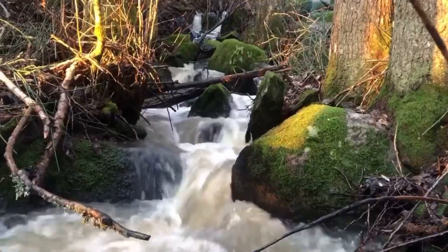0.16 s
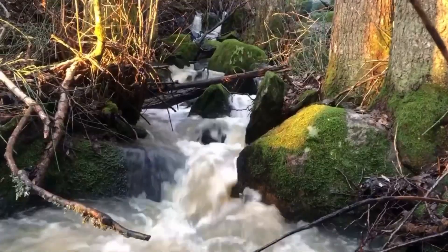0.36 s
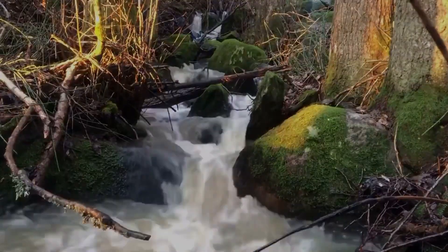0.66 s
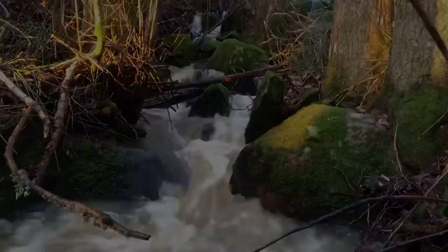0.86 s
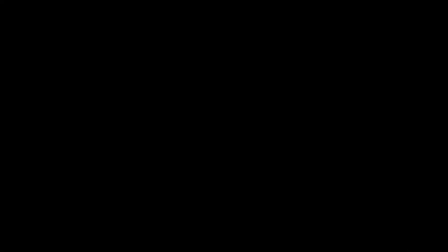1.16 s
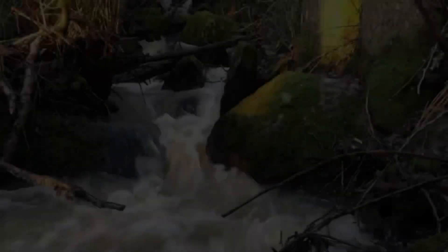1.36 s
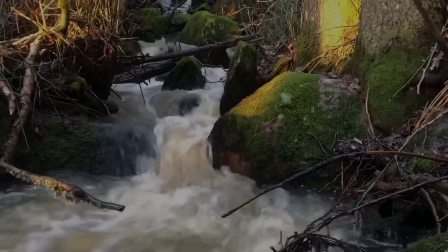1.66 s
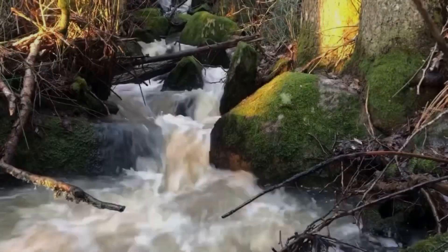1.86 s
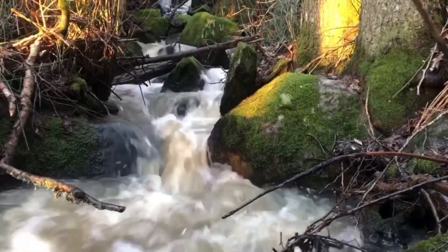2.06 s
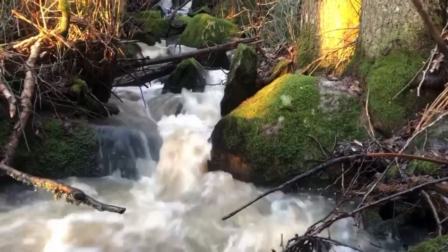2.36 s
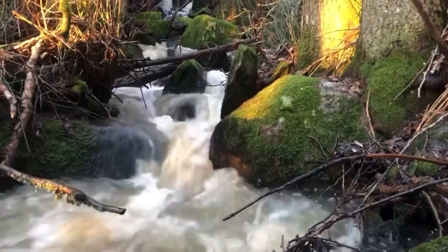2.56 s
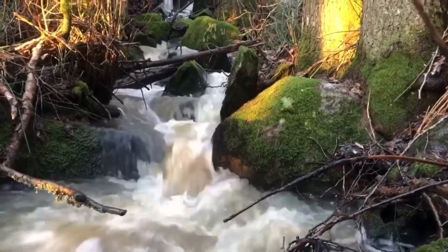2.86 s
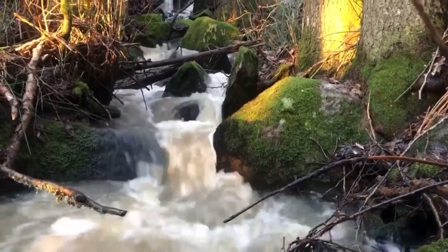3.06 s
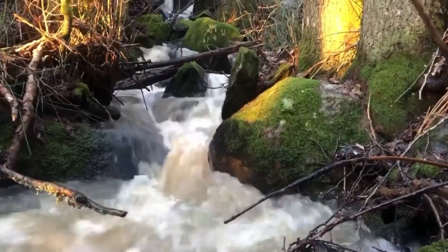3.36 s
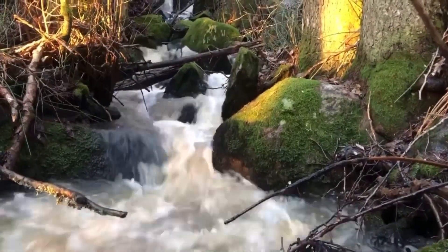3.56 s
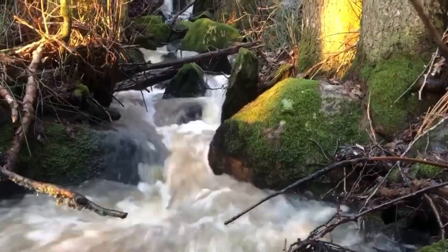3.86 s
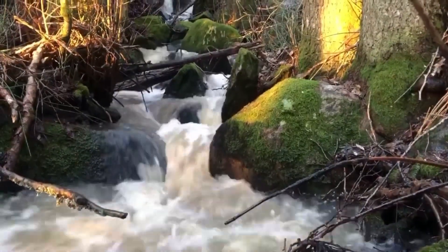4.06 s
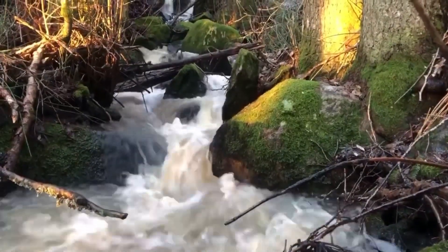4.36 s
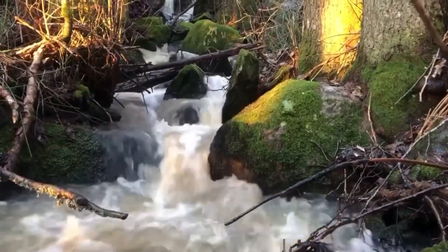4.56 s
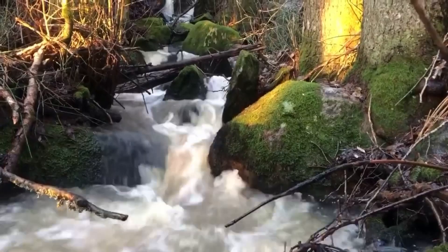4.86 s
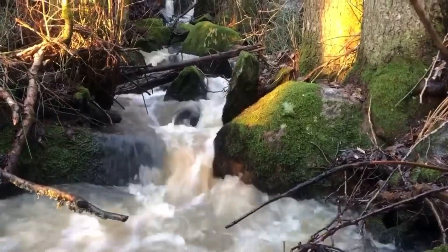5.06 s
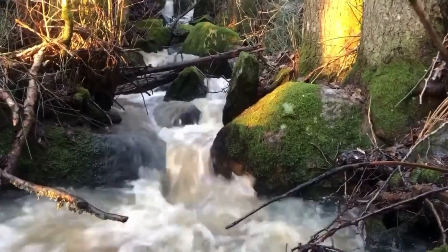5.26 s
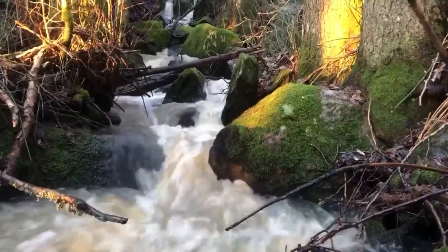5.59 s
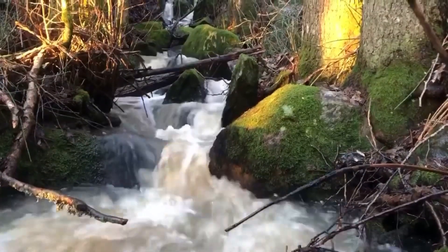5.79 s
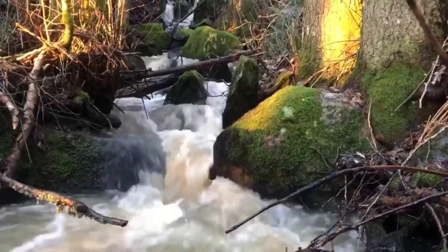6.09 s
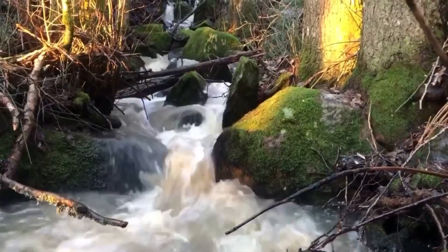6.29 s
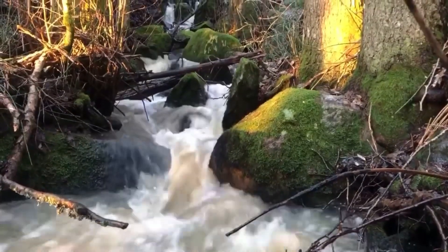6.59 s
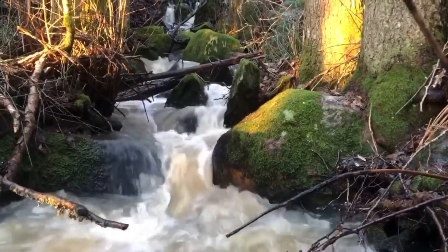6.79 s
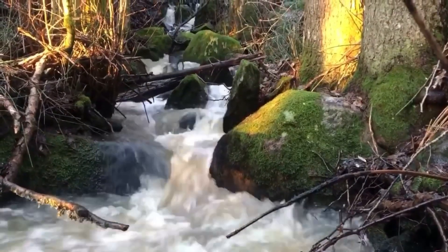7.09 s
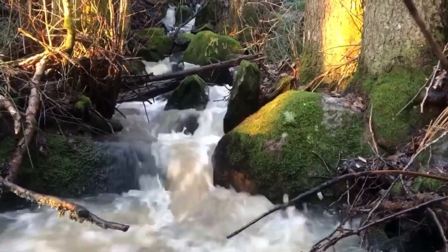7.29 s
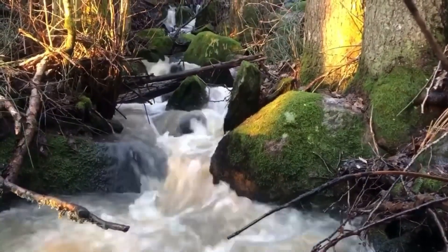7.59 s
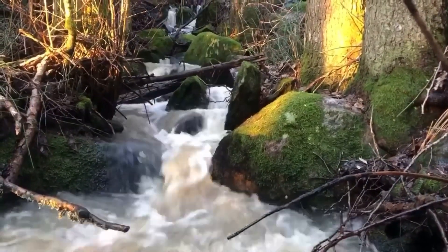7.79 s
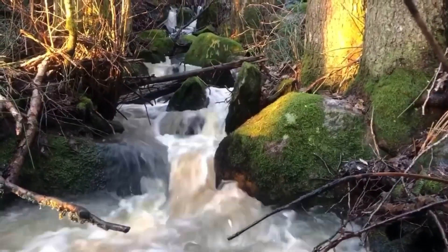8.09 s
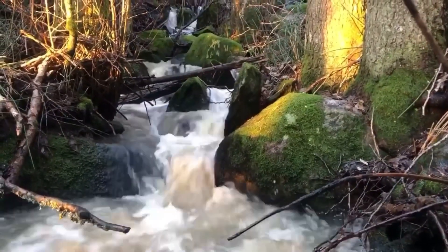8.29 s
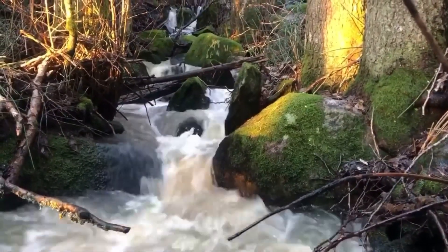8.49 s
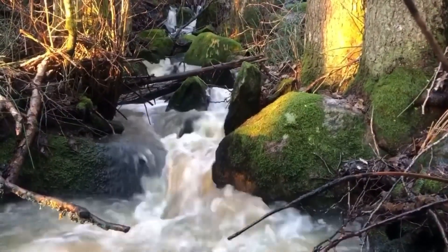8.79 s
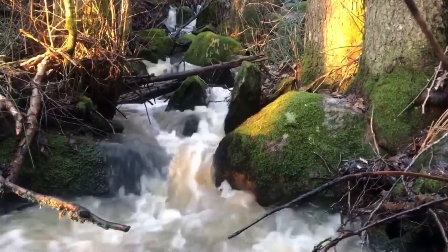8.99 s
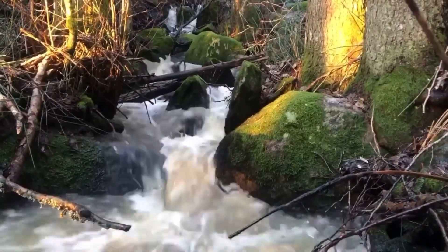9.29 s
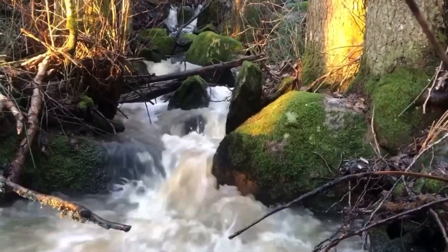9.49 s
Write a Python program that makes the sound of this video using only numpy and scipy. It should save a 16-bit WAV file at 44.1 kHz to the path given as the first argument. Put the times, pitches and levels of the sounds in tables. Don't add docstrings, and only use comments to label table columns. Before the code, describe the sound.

A close woodland stream pours between boulders with bubbling, splashing roar; it dips to a short silence early on, then returns and continues.

```python
import sys
import numpy as np
from scipy import signal
from scipy.fft import rfft, irfft
from scipy.io import wavfile
from scipy.ndimage import uniform_filter1d

SR = 44100
rng = np.random.default_rng(int(sys.argv[2]) if len(sys.argv) > 2 else 0)


def natural_amplitude(level_db):
    exponent = np.asarray(level_db, float) / 20
    return 10 ** exponent


def unload_wav(signal):
    wavfile.write(
        sys.argv[1],
        SR,
        np.round(np.clip(np.atleast_2d(signal).T, -1, 1) * 32767).astype(np.int16),
    )


N = 425565
CUT_S, BACK_S = 1.034, 1.152


def evened(x):
    return x / np.sqrt(np.mean(np.abs(x) ** 2) + 1e-20)


def read(points, hz):
    at_hz, value = np.transpose(points)
    return np.interp(np.log(hz + 1), np.log(at_hz + 1), value)


def add(mix, start_s, sound):
    part = mix[round(start_s * SR):][:len(sound)]
    part += sound[:len(part)]


def blotches(shape, bins, frames):
    hills = rng.standard_normal(shape[::-1]).T
    for _ in range(2):
        hills = uniform_filter1d(hills, bins, 0)
        hills = uniform_filter1d(hills, frames, 1)
    return evened(hills)


def bubble(hz, cycles, rise):
    turns = np.arange(int(3 * cycles * SR / hz)) * hz / SR
    age = turns / cycles
    ring = np.sin(2 * np.pi * turns * (1 + rise * np.minimum(age, 2)))
    return ring * np.exp(-2.3 * age) * (1 - np.exp(-turns / 0.9))


def foam(per_s, spread_db, cycles):
    out = np.zeros(N)
    for hz in np.geomspace(90, 9000, num=30):
        where = rng.random(size=8000)
        size = np.minimum(rng.exponential(1, size=8000), 5)
        count = int(per_s * np.sqrt(hz / 1000) * N / SR)
        bursts = np.bincount((where[:count] * N).astype(int), natural_amplitude(spread_db * size[:count]), N)
        ringing = signal.oaconvolve(bursts, bubble(hz, cycles, rise=0.08))[:N]
        out += np.sqrt(hz) * evened(ringing)
    return out


# time in seconds, level in dB.
STRENGTH = [(0, -0.7), (.6, 1.3), (1.6, 0.9), (2.2, 1), (2.8, 0.5), (3.3, 0.1), (4.0, 0), (5.0, -0.2),
            (5.6, .3), (6.7, -0.5), (7.4, 0.6), (7.9, -.5), (9.2, .1), (9.65, -1)]
# time in seconds, swell in dB, centre pitch in Hz.
SURGES = [(0.0, 4, 80), (0.13, 2.5, 8000), (0.25, 1.7, 1010), (0.26, 3, 80), (0.55, 1.2, 8000),
          (0.57, 1, 3180), (0.57, 2.5, 80), (0.6, 1.9, 1130), (1.45, 0, 450), (1.87, 3, 570),
          (1.95, 0.5, 80), (2.12, 1.5, 250), (2.36, 1, 5050), (2.37, 0.5, 800), (2.59, 1.5, 400),
          (2.73, 3.6, 140), (3.22, 1.5, 1130), (3.23, 1.1, 2840), (3.65, 3.5, 900), (3.77, 3.5, 80),
          (3.97, 2.5, 360), (4.46, 3, 800), (4.74, 2.5, 80), (5.45, 1.3, 8000), (5.69, 3, 4010),
          (5.72, 2.1, 160), (6.31, 2.0, 570), (7.73, 3.5, 130), (9.44, 5, 230), (9.59, 2.4, 90)]
# time in seconds, dip in dB, centre pitch in Hz.
LULLS = [(0.11, -3.5, 90), (1.57, -1.5, 710), (2.57, -5.5, 90), (2.83, -1.5, 900), (3.04, 0, 180),
         (3.27, -2.2, 110), (3.399, -6, 160), (3.64, -1.5, 80), (3.71, -4, 2840), (3.85, -4.5, 450),
         (4.05, -1, 80), (4.12, -1.4, 1130), (4.3, -3, 320), (4.63, -2.9, 80), (5.03, -0.5, 140),
         (5.58, -3, 80), (6.15, -1, 400), (6.42, -3, 320), (6.84, -2.5, 640), (7.13, -2.7, 280),
         (7.59, -1.5, 80), (7.84, -1.7, 1010), (7.84, -0.5, 3570), (7.87, -1, 280), (8.17, -2, 90),
         (8.34, 0, 140), (8.55, -3.5, 8000), (8.61, -3, 320), (9.65, -1, 900), (9.65, -0.8, 2840)]
# frequency in Hz, depth in dB.
HEAVE = [(140, 1.3), (370, .9), (850, 1), (2500, 0.52)]


def surges(hz, t):
    width_s, width_octaves, depth = 0.039, 0.55, 1.3
    centre_s, db, centre_hz = np.transpose(list(SURGES) + list(LULLS))
    octaves_off = np.log2((hz[:, None] + 1) / centre_hz)
    band = np.exp(-0.5 * (octaves_off / width_octaves) ** 2)
    swell = np.exp(-0.5 * ((t - centre_s[:, None]) / width_s) ** 2)
    at_hz, depth_db = np.transpose(HEAVE)
    shares = np.array([np.interp(np.log(hz + 1), np.log(at_hz), row) for row in np.diag(depth_db)])
    heave = blotches((len(HEAVE), len(t)), bins=1, frames=22)
    flow_db = np.interp(t, *np.transpose(STRENGTH))
    return flow_db + depth * (band * db) @ swell + shares.T @ heave


# frequency in Hz, density in dB per Hz.
COLOUR = [(18, -52), (30, -32.5), (51, -12.5), (112, -1), (205, -4), (254, -1), (373, -0.5), (535, -4),
          (748, -0.5), (1020, -5.5), (1570, -7.5), (2150, -12.5), (8450, -18.5), (9300, -24.5),
          (12100, -48.5), (20500, -120)]


def cascade():
    water_db = -28
    grid = dict(nperseg=512, noverlap=384)
    hz, t, near = signal.stft(foam(per_s=90, spread_db=1.0, cycles=6.93), SR, **grid)
    near_power = uniform_filter1d(np.mean(np.abs(near) ** 2, 1), size=5)
    near = near / np.sqrt(near_power)[:, None]
    far = evened(signal.stft(rng.standard_normal(N), SR, **grid)[2])
    near_share = read([(100, 0.16), (500, 0.34), (2000, 0.41), (8000, 0.55)], hz)
    near_share = np.clip(near_share, 0, 1)[:, None]
    splash = blotches(far.shape, bins=60, frames=5)
    throb = blotches(far.shape, bins=120, frames=20)
    patches = blotches(far.shape, bins=4, frames=12)
    splash_db = read([(200, 0.26), (1000, 0.34), (5000, 0.83)], hz)[:, None]
    field_db = 0.87 * surges(hz, t) + splash_db * splash + 0.27 * throb + 0.42 * patches
    water = np.sqrt(near_share) * near + np.sqrt(1 - near_share) * far
    flat = signal.istft(water * natural_amplitude(field_db), SR, **grid)[1][:N]
    colour = natural_amplitude(read(COLOUR, np.fft.rfftfreq(N, 1 / SR)))
    return natural_amplitude(water_db) * evened(irfft(rfft(flat) * colour, N))


# start in seconds, level in dB, pitch in Hz.
GULPS = [(0.058, -24, 745), (0.25, -18.5, 694), (0.446, -20, 660), (0.598, -22.5, 894), (1.187, -47, 806),
         (1.222, -36.5, 835), (1.914, -21, 850), (1.995, -21, 815), (2.354, -19, 670), (2.41, -20, 717),
         (2.599, -24, 526), (3.203, -24, 990), (3.242, -22, 950), (3.447, -22.5, 600), (3.644, -21, 920),
         (3.963, -20.5, 720), (4.443, -27, 756), (5.37, -22, 930), (5.415, -23, 710), (6.296, -21.5, 570),
         (6.722, -23.5, 700), (7.008, -21, 720), (7.072, -21.5, 814), (7.733, -19, 730), (7.962, -22, 890),
         (8.056, -20, 910), (8.553, -21.5, 664), (8.807, -18.5, 770), (9.169, -21, 760), (9.441, -20, 1033)]
# start in seconds, level in dB, pitch in Hz.
GLUGS = [(1.448, -23.5, 432), (2.106, -24.5, 243), (2.136, -31, 155), (2.207, -20.5, 392),
         (2.578, -26, 323), (2.725, -29.5, 171), (2.924, -24, 325), (3.959, -19.5, 364), (4.146, -22, 418),
         (6.855, -27.5, 303), (7.635, -20, 358), (7.706, -31, 328), (8.138, -24, 265), (8.937, -21, 467)]
# start in seconds, level in dB, pitch in Hz, pitch rise as a share.
GLIDES = [
    (1.232, -39, 800, 0),
    (6.262, -25, 863, -0.13),
    (6.345, -25.5, 480, 0.16),
    (6.445, -24, 642, .08),
    (6.966, -26.5, 319, .16),
    (8.945, -27.5, 635, 0.041),
]


def gulps():
    out = np.zeros(N)
    for table, rise, lift_db in ((GULPS, 0.019, 5.0), (GLUGS, 0.04, 4.0)):
        for start_s, db, hz in table:
            add(out, start_s, natural_amplitude(db + lift_db) * bubble(hz, cycles=7.1, rise=rise))
    for start_s, db, hz, rise in GLIDES:
        add(out, start_s, natural_amplitude(db + 2.5) * bubble(hz, cycles=14, rise=rise))
    return out


# start in seconds, level in dB, pitch in Hz.
TICKS = [(0.136, -30.5, 6700), (0.165, -28, 3000), (0.38, -30, 4630), (0.551, -33, 2730),
         (0.593, -26, 1480), (0.792, -32, 7110), (0.951, -32, 1600), (1.431, -35, 2050),
         (2.036, -25.5, 5300), (2.374, -35, 6459), (3.222, -33, 3273), (3.269, -27.5, 3100),
         (3.775, -26, 6300), (4.435, -29, 7407), (4.815, -29, 7235), (5.447, -31, 5684), (5.453, -28, 7350),
         (6.197, -25.5, 4800), (6.889, -31.5, 4651), (7.006, -30, 6500), (7.29, -30, 5857),
         (7.4, -28, 4392), (7.448, -22.5, 2530), (8.213, -17, 1220), (8.63, -27, 6000), (9.208, -29, 8850),
         (9.23, -30, 5040)]


def ticks():
    out = np.zeros(N)
    for start_s, db, hz in TICKS:
        add(out, start_s, natural_amplitude(db + 3.0) * bubble(hz, cycles=3 + 0.004 * hz, rise=0.014))
    return out


# start in seconds, peak in dB.
SPLASHES = [(0.535, -27), (0.7926, -27), (2.036, -21), (2.35, -20), (3.219, -27), (5.4385, -21),
            (5.951, -25), (6.194, -25.5), (7.0079, -19.5), (7.2894, -23), (7.401, -25), (8.007, -24),
            (8.629, -18), (9.2094, -27.5)]


def splashes():
    out, t = np.zeros(N), np.arange(3000) / SR
    envelope = (1 - np.exp(-t / 0.004)) * np.exp(-t / 0.018)
    for start_s, db in SPLASHES:
        hiss = evened(np.diff(uniform_filter1d(rng.standard_normal(len(t) + 1), size=3)))
        add(out, start_s, natural_amplitude(db - 11) * hiss * envelope)
    return out


def strays():
    per_s, level_db, low_hz, high_hz = 5, -32, 450, 1047
    out, rows = np.zeros(N), rng.random((200, 4))
    for when, size, glide, loud in rows[:int(per_s * N / SR)]:
        hz = low_hz * (high_hz / low_hz) ** size
        pocket = bubble(hz, cycles=8, rise=0.13 * glide - 0.04)
        add(out, when * N / SR, natural_amplitude(level_db + 5.5 + 4 * loud) * pocket)
    return out


def scene():
    t = np.arange(N) / SR
    fade_out = 1 - 1.24 * (t - 0.37)
    fade_in = 1.12 * (t - BACK_S)
    fader = np.clip(np.where(t < BACK_S, fade_out, fade_in), 0, 1)
    water = fader * (cascade() + strays())
    return (water + gulps() + ticks() + splashes())[None]


# frequency in Hz, step in dB.
STEP = [(500, -15.5), (2000, -7.5), (4000, -1.05), (7000, 2.5), (9000, 3.5)]


def camera_rounding(x, size=1024, count=440, order=8):
    n, k = np.arange(2 * size) + 0.5, np.arange(count) + 0.5
    window = np.sin(np.pi * n / (2 * size))[:, None]
    basis = window * np.cos(np.pi / size * np.outer(n + size / 2, k))
    padded = np.pad(x, (size, 2 * size))
    lines = np.lib.stride_tricks.sliding_window_view(padded, 2 * size)[::size].copy() @ basis
    hz = k * SR / (2 * size)
    local_power = uniform_filter1d(uniform_filter1d(lines ** 2, size=60, axis=1), size=3, axis=0)
    mask = np.sqrt(np.abs(local_power) + 1e-14)
    starved = np.repeat(rng.exponential(1, (len(lines), count // order)), order, axis=1)
    step = mask * natural_amplitude(read(STEP, hz) + 2.6 * starved)
    lines = np.sign(lines) * step * np.floor(np.abs(lines) / step + 0.4)
    edge_hz = 9284 - 210 * uniform_filter1d(rng.exponential(1, len(lines)), size=2)
    lines = lines * (hz < edge_hz[:, None])
    halves = (lines @ basis.T) * 2 / size
    return (halves[1:, :size] + halves[:-1, size:]).ravel()[:len(x)]


def silence_gate():
    since_s = np.arange(N) / SR - CUT_S
    drop = natural_amplitude(-5500 * np.clip(since_s, 0, 1))
    tail = natural_amplitude(-40) * (1 - since_s / 0.026)
    return np.where(since_s > BACK_S - CUT_S, 1, np.clip(drop + tail, 0, 1))


def roll_off(x):
    return signal.sosfilt(signal.butter(12, 9670, fs=SR, output="sos"), x)


def record(dry):
    mix = silence_gate() * camera_rounding(dry[0])[None]
    return roll_off(mix)


dry = scene()
out = record(dry)
unload_wav(out)
```